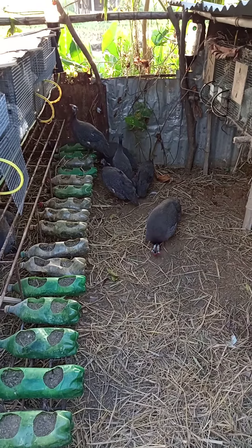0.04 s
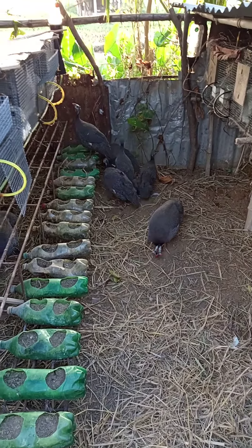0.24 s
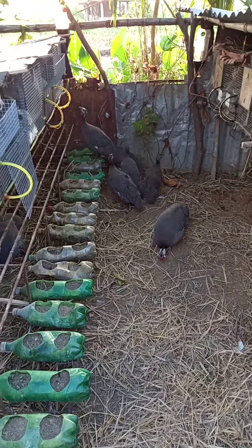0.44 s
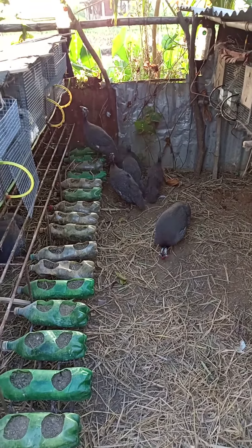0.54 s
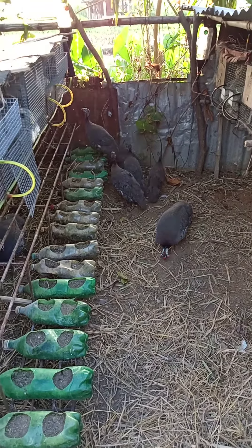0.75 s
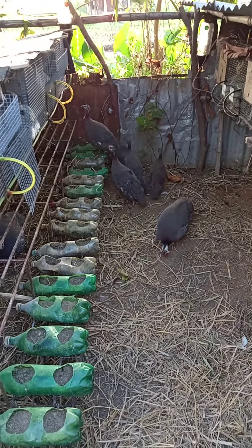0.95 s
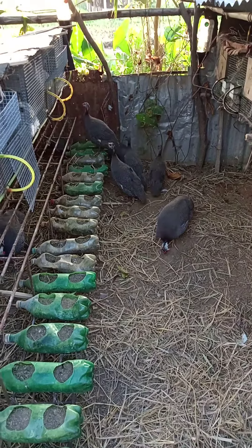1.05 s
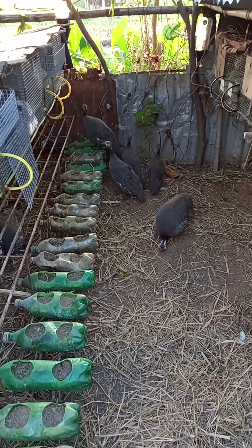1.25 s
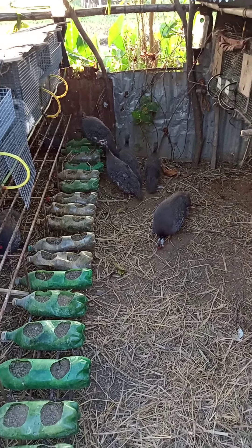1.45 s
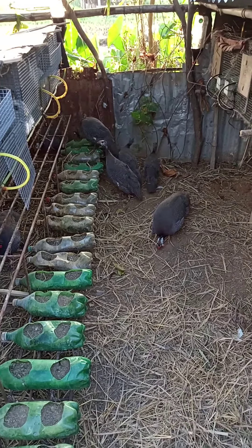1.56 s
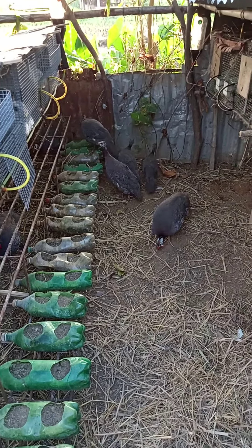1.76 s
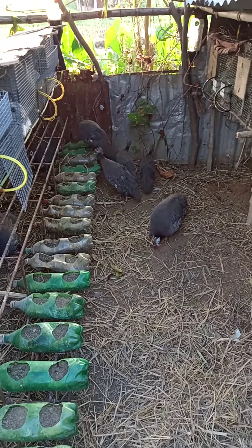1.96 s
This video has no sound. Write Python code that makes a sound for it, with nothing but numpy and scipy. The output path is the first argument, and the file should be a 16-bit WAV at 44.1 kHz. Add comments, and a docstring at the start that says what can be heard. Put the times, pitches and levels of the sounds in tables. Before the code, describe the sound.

Two brief, raspy guinea fowl calls stand out close to the microphone; quieter clucks and falling whistles from other birds follow, with straw crackles, a short metallic-pen reflection and low outdoor rumble.

```python
"""Two seconds with guinea fowl in a small pen of sheet metal with straw on the ground.
From the start a low outdoor rumble and a soft hush go on, and feet scratch in the straw as bursts of crackles.
At 0.2 s one bird gives a short harsh call, and at 1.2 s a second: rasping pulses through sharp resonances.
Around the calls and after them come soft clucks, which are quiet rasps through broad resonances.
Thin gliding tones are the whistles of birds further off; most of them fall in pitch."""
import sys
import numpy as np
from scipy import signal
from scipy.fft import rfft, irfft
from scipy.io import wavfile
from scipy.ndimage import uniform_filter1d

SR = 44100
rng = np.random.default_rng(int(sys.argv[2]) if len(sys.argv) > 2 else 0)


def unload_audio(sound):
    """Save the sound as a 16-bit wav file, at the path given as the first command line argument."""
    columns = np.transpose(np.atleast_2d(sound))
    # keep every value between -1 and 1, then stretch to whole-number steps
    steps = np.round(np.clip(columns, -1, 1) * 32767)
    wavfile.write(sys.argv[1], SR, steps.astype(np.int16))


N = 88200
TIME = np.arange(N) / SR

# separate reflections from the metal walls: (delay [s], level [dB])
WALLS = [(0.0139, -24.5), (.0265, -21)]


def from_db(db):
    """Turn decibels into a factor to multiply by."""
    return 10 ** (np.asarray(db) / 20)


def rms_one(x):
    """Scale a signal to an average power of 1."""
    return x / np.sqrt(np.mean(x ** 2) + 1e-20)


def cut(x, hz, kind, order=4):
    """Butterworth filter: "low" keeps what lies below hz, "high" what lies above."""
    return signal.sosfilt(signal.butter(order, hz, kind, fs=SR, output="sos"), x)


def drift(hz):
    """Random motion with spread 1 that changes no faster than about hz."""
    settled = cut(rng.standard_normal(2 * N), hz, "low", order=2)[N:]
    return rms_one(settled)


def colour(x, spectrum):
    """Give a signal a smooth spectrum and an average power of 1."""
    hz, db = np.transpose(spectrum)
    bins = np.maximum(np.fft.rfftfreq(N, 1 / SR), 1)
    gain = from_db(np.interp(np.log(bins), np.log(hz), db))
    return rms_one(irfft(rfft(x) * gain, N))


def resonate(x, hz, width_hz):
    """Pass a signal twice through one resonance, with gain about 1 at its peak; width_hz is for one pass."""
    r = np.exp(-np.pi * width_hz / SR)
    forward = np.array([1, 0, -1]) * (1 - r * r) / 2
    feedback = [1, -2 * r * np.cos(2 * np.pi * hz / SR), r * r]
    return signal.lfilter(forward, feedback, signal.lfilter(forward, feedback, x))


def swell(peak_s, rise_s, fall_s):
    """A rounded rise and fall of height 1."""
    u = (TIME - peak_s) / np.where(TIME < peak_s, rise_s, fall_s)
    return np.cos(np.pi / 2 * np.clip(u, -1, 1)) ** 2


def even(x):
    """Hold the level of a voice steady from cycle to cycle."""
    power = np.abs(uniform_filter1d(x * x, size=170))  # average over 170 samples, about 4 ms
    return x / np.sqrt(power + 1e-12)


def syrinx():
    """The bird's voice organ: uneven pulses, each with a puff of rasping air that dies down."""
    pulse_hz, jitter = 368.4, .09  # jitter: spread of the pulse rate, as a share of it
    rasp, rasp_decay = 0.61, 2.6  # air's share of the power; how fast a puff fades [1/cycle]
    cycles = np.cumsum(pulse_hz * (1 + jitter * drift(pulse_hz))) / SR
    pulses = np.diff(np.floor(cycles), prepend=0)
    air = rng.standard_normal(N) * np.exp(-rasp_decay * (cycles % 1))
    return np.sqrt(1 - rasp) * rms_one(pulses) + np.sqrt(rasp) * rms_one(air)


def harsh_call(course, throat):
    """The syrinx drives sharp resonances; the upper ones gain as the beak opens, the lowest fade on either side."""
    upper_hz, low_hz, low_loss = 3200, 2000, 0.73  # low_loss: fading, as a share of the lift up or down
    throb_db, throb_hz = 1.5, 220  # spread and pace of the change in strength
    s, level_db, lift_db = np.transpose(course)
    source = syrinx()
    lift = np.interp(TIME, s, lift_db)
    voice = 0
    for hz, width, db in throat:
        tilt_db = lift if hz > upper_hz else -low_loss * np.abs(lift) * (hz < low_hz)
        voice = voice + from_db(db + tilt_db) * resonate(source, hz, width)
    during_call = (TIME > s[0]) * (TIME < s[-1])
    voice = even(voice) * from_db(np.interp(TIME, s, level_db)) * during_call
    throb = rms_one(from_db(throb_db * drift(throb_hz)))  # strong and weak pulses
    without_lows = cut(voice * throb, 850, "high", order=6)
    return cut(without_lows, 5320, "low", order=10)


def clean_partials():
    """Brief pure tones swell within the rasp of the calls."""
    # the tones: (peak [s], rise [s], fall [s], pitch [Hz], level [dB])
    partials = [(0.2464, 0.02, 0.014, 1083, -24.5), (0.236, 0.034, 0.023, 378, -40),
                (0.225, 0.018, 0.025, 3536, -23.5), (1.241, 0.02, 0.02, 1087, -34),
                (1.231, 0.014, 0.022, 2315, -28), (1.239, 0.018, 0.013, 3960, -25.5),
                (1.237, 0.013, 0.013, 1612, -32), (.226, 0.0064, .009, 1337, -29.5),
                (0.2133, 0.0098, 0.01, 1630, -33.5), (.218, .012, .012, 2770, -28.5)]
    out = 0
    for s, rise, fall, hz, db in partials:
        tone = np.sqrt(2) * np.sin(2 * np.pi * hz * TIME)  # power 1
        out = out + from_db(db) * swell(s, rise, fall) * tone
    return out


def sizzle(call):
    """A faint high hiss that follows the moment-to-moment size of the harsh calls."""
    # spectrum of the hiss: (frequency [Hz], relative level [dB])
    hiss_spectrum = [(5000, -14.5), (6500, -6), (8500, 0.5), (10500, -9), (12700, 0), (15500, -22)]
    return from_db(-50.5) * np.abs(call) * colour(rng.standard_normal(N), hiss_spectrum)


def wall_echoes(call):
    """The metal walls throw back weaker, later copies of the calls."""
    return sum(from_db(db) * np.interp(TIME - delay, TIME, call, left=0) for delay, db in WALLS)


def clucks():
    """Quiet rasps: the syrinx through two broad resonances, one of them the same in every cluck."""
    # the soft clucks: (peak [s], rise [s], fall [s], resonance [Hz], level [dB])
    cluck_list = [(.04, .05, 0.03, 2120, -55.5), (.838, 0.02, 0.03, 3680, -56),
                  (0.948, .032, 0.036, 2550, -45), (1.36, 0.021, 0.03, 3300, -45.5),
                  (1.515, 0.04, 0.028, 2510, -46), (1.686, 0.035, 0.029, 2630, -46),
                  (1.845, 0.047, 0.027, 2720, -45.5), (1.875, 0.025, 0.02, 1150, -52)]
    source = syrinx()
    chest = from_db(-2.5) * resonate(source, 1970, 930)
    out = 0
    for s, rise, fall, hz, db in cluck_list:
        voice = resonate(source, hz, 960) + chest
        out = out + from_db(db) * swell(s, rise, fall) * even(voice)
    return cut(out, 5200, "low", order=8)


def whistles():
    """Thin wavering, flickering tones that glide from one pitch to another."""
    # whistles and peeps: (start [s], length [s], first pitch [Hz], last pitch [Hz], level [dB])
    glides = [(0.138, 0.088, 5130, 5020, -57.5), (0.3, 0.11, 4100, 3880, -57.5),
              (.545, 0.04, 5450, 5100, -62), (.578, .1, 5130, 4950, -55.5), (.828, .047, 3290, 3260, -47.5),
              (.864, .013, 2950, 2830, -47), (.875, .028, 2560, 2330, -49), (1.768, .038, 1800, 1930, -49),
              (1.825, .05, 1880, 1740, -52), (1.633, .04, 1660, 1610, -45.5),
              (0.83, 0.12, 4750, 4400, -61.5), (.965, .04, 2600, 2850, -52.5),
              (1.69, 0.145, 4820, 3550, -58), (0.935, 0.035, 2130, 2300, -50),
              (0.984, 0.085, 3950, 3800, -54), (0.824, 0.035, 3660, 3700, -56.5),
              (1.021, .05, 1850, 1860, -56.5), (0.995, 0.052, 2800, 2500, -52),
              (1.076, 0.13, 5300, 4470, -59.5), (1.38, 0.11, 4800, 4400, -62.5),
              (1.576, 0.11, 4960, 4800, -56.5)]
    waver_share, waver_hz = .011, 200  # spread of the pitch, as a share of it, and its pace
    flicker_db, flicker_hz = 2.5, 90  # spread and pace of the changes in level
    edge = 0.32  # small values start and stop a tone more suddenly
    waver = 1 + waver_share * drift(waver_hz)
    out = 0
    for s, length, first_hz, last_hz, db in glides:
        u = np.clip((TIME - s) / length, 0, 1)  # runs from 0 to 1 during the tone
        pitch = (first_hz + (last_hz - first_hz) * u) * waver
        phase = 2 * np.pi * np.cumsum(pitch) / SR
        shape = np.abs(np.sin(np.pi * u)) ** edge
        out = out + np.sqrt(2) * from_db(db) * shape * np.sin(phase)
    return out * rms_one(from_db(flicker_db * drift(flicker_hz)))


def straw():
    """Each scratch of the feet snaps and rubs many small stalks, heard as a burst of tiny clicks."""
    # the scratches: (peak [s], rise [s], fall [s], body level [dB], crisp top level [dB])
    scratches = [(.036, .006, .016, -69, -70), (.075, 0.007, 0.011, -58, -75),
                 (0.384, .01, 0.025, -56.5, -68.5), (.69, 0.044, 0.063, -53.5, -79),
                 (1.37, 0.041, 0.036, -48.5, -80), (1.515, 0.018, 0.041, -48.5, -91),
                 (1.628, 0.008, 0.05, -53, -76), (1.96, 0.031, 0.074, -43, -70)]
    # spectrum of the body of the crackle: (frequency [Hz], relative level [dB])
    body_spectrum = [(200, -12.5), (600, -7), (1600, -4), (3500, -6), (5000, -6.5), (6300, -21.5),
                     (8000, -40.5), (10000, -39.5)]
    # spectrum of its crisp top: (frequency [Hz], relative level [dB])
    top_spectrum = [(5000, -18.5), (8000, -1), (10000, -10), (12800, 10), (14000, -5), (15500, -16)]
    crackles_per_s, spread_db = 2500, 1.5
    sizes = from_db(spread_db * np.minimum(rng.exponential(1, N), 4)) * rng.choice([-1, 1], N)
    crackles = sizes * (rng.random(N) < crackles_per_s / SR)
    body = colour(crackles, body_spectrum)
    top = colour(crackles, top_spectrum)
    out = 0
    for s, rise, fall, body_db, top_db in scratches:
        out = out + swell(s, rise, fall) * (from_db(body_db) * body + from_db(top_db) * top)
    return out


def pen_scatter(x):
    """Straw and corrugated walls smear a loud call into a short noisy decay."""
    # spectrum of the scattered sound: (frequency [Hz], relative level [dB])
    scatter_spectrum = [(1000, -19), (2400, -5), (3600, -1), (5000, -14.5), (6500, -46.5)]
    decay_s = .24  # time to fade by 60 dB
    keep = from_db(-120 / (decay_s * SR))  # share of the power left after one sample
    power = signal.lfilter([1 - keep], [1, -keep], x * x + 1e-18)
    level = np.interp(TIME - WALLS[0][0], TIME, np.sqrt(power), left=0)  # waits for the first wall
    return from_db(-22) * level * colour(rng.standard_normal(N), scatter_spectrum)


def pen_tail(x):
    """The short blurred ring of the pen: fading noise that starts with the first wall reflection."""
    decay_s = .2  # time to fade by 60 dB
    tail = rng.standard_normal(N) * from_db(-60 * TIME / decay_s) * (TIME > WALLS[0][0])
    return signal.fftconvolve(x, tail / np.sqrt(np.sum(tail ** 2)))[:N]


def outdoor_hush():
    """Soft broad noise whose level flutters a little."""
    # spectrum of the hush: (frequency [Hz], relative level [dB])
    hush_spectrum = [(40, -30.5), (150, -13), (260, -9), (480, -9), (800, -12.5), (1250, -11.5),
                     (2500, -15.5), (4000, -20), (5200, -22), (6200, -38), (7500, -47.5), (10000, -55.5),
                     (12800, -42), (15500, -64)]
    flutter_db, flutter_hz = 1.46, 12  # spread and pace of the changes in level
    level = from_db(-49.5 + flutter_db * drift(flutter_hz))
    return level * colour(rng.standard_normal(N), hush_spectrum)


def outdoor_rumble():
    """Low noise that swells and sinks."""
    # course of the rumble: (time [s], level [dB])
    rumble_course = [(0.0, -61), (0.08, -50.5), (0.36, -52), (0.41, -59), (0.7, -51), (1.0, -54),
                     (1.26, -52.5), (2.0, -52)]
    # spectrum of the rumble: (frequency [Hz], relative level [dB])
    rumble_spectrum = [(25, -44), (40, -24), (62, -4.5), (90, -0.5), (115, 0.5), (137, 1.5), (170, -5),
                       (220, -10), (320, -22.5), (600, -55)]
    level = from_db(np.interp(TIME, *np.transpose(rumble_course)))
    return level * colour(rng.standard_normal(N), rumble_spectrum)


def scene():
    """The near caller with its reflections, the other birds, the straw and the outdoor air."""
    # course of each call: (time [s], level [dB], lift of the upper resonances as the beak opens [dB])
    first_course = [(.199, -52, -17.5), (.208, -36, -2), (.213, -25.5, -1), (.2205, -19.5, -1.5),
                    (.2235, -22, -2), (.2265, -16, 0), (.233, -20.5, 2), (.238, -18.5, 0.5),
                    (.247, -25, 4.5), (.254, -23.5, 3), (.262, -30.5, 6), (.268, -32, 10), (.272, -39, 8.5),
                    (.284, -41, 10)]
    second_course = [(1.214, -48, -24), (1.216, -41, -21), (1.222, -46.5, -25), (1.227, -30.5, -4),
                     (1.234, -21.5, -2), (1.2428, -19, 3), (1.2445, -29.5, 3), (1.253, -28, 6.5),
                     (1.2568, -37, 7), (1.2585, -27.5, 9.5), (1.261, -39, 6), (1.263, -28.5, 10),
                     (1.269, -32.5, 10.5), (1.272, -44, 11), (1.288, -48, 12)]
    # throat and beak resonances in each call: (frequency [Hz], width [Hz], relative level [dB])
    first_throat = [(1068, 150, -6.5), (1300, 260, -8), (1639, 140, -10), (1900, 160, -12.5),
                    (2243, 150, -3.5), (2457, 280, -1), (2786, 210, -1.5), (3020, 260, -4.5),
                    (3610, 190, 1), (3950, 210, -3.5), (4310, 290, -8), (4870, 180, -13.5)]
    second_throat = [(1060, 89, -11), (1410, 100, -19), (1617, 150, -3.5), (2277, 86, 2), (2535, 170, 2),
                     (2864, 120, 2.5), (3546, 240, 1.5), (4047, 190, 2), (4590, 190, -9), (4720, 150, -11),
                     (4980, 130, -14)]
    near = harsh_call(first_course, first_throat) + harsh_call(second_course, second_throat)
    caller = near + clean_partials() + sizzle(near) + wall_echoes(near)
    others = clucks() + whistles()
    ring = pen_scatter(near) + pen_tail(from_db(-7.5) * others)
    background = outdoor_hush() + outdoor_rumble()
    return (caller + others + ring + straw() + background)[None]


def record(dry):
    """Cut the top steeply above 15.5 kHz."""
    return signal.sosfilt(signal.ellip(10, .1, 80, 15500, fs=SR, output="sos"), dry)


dry = scene()
out = record(dry)
unload_audio(out)
```